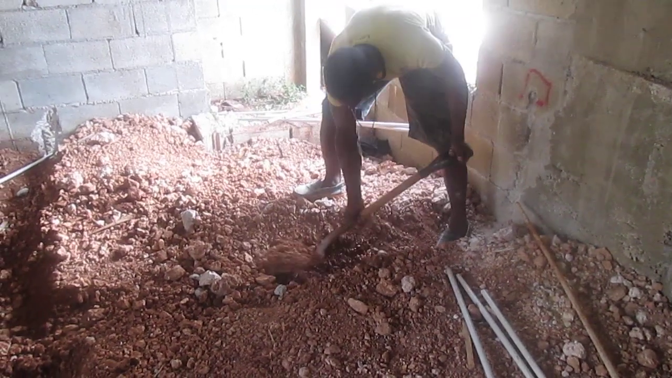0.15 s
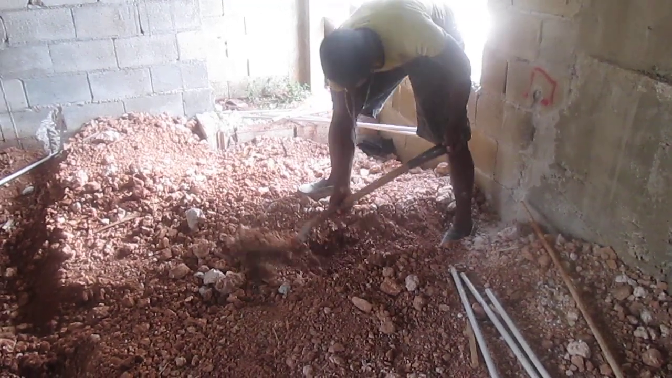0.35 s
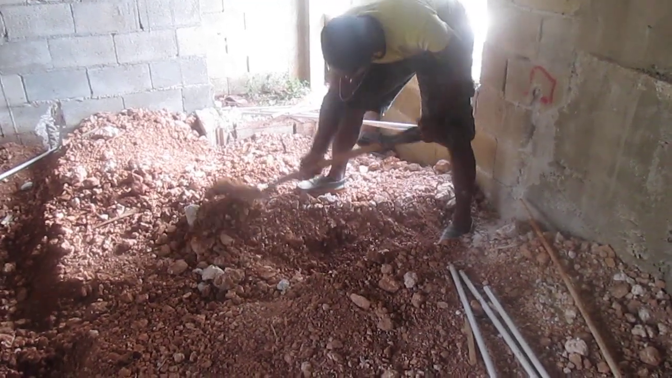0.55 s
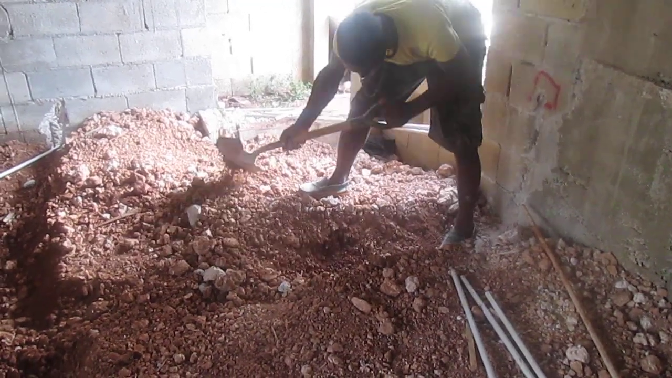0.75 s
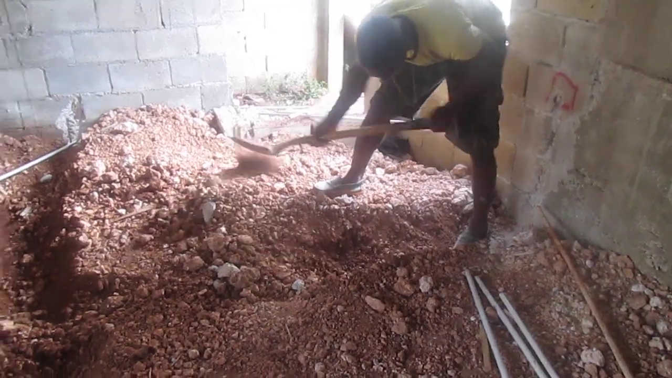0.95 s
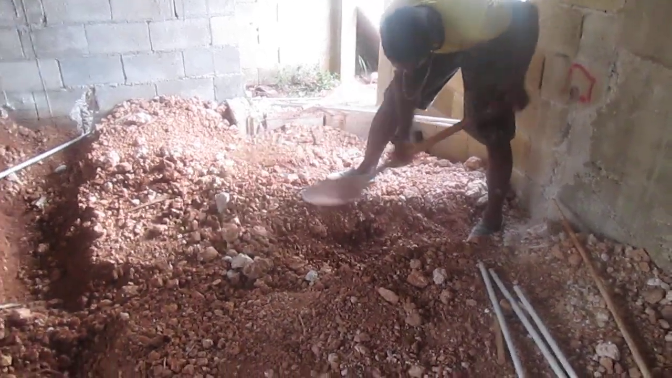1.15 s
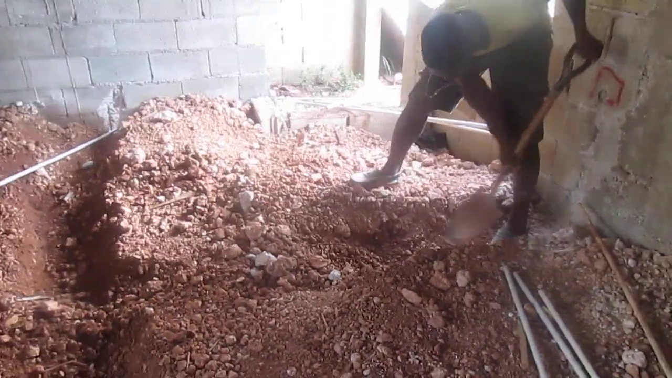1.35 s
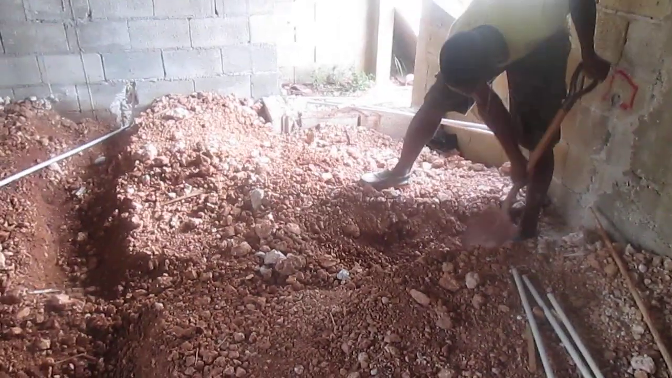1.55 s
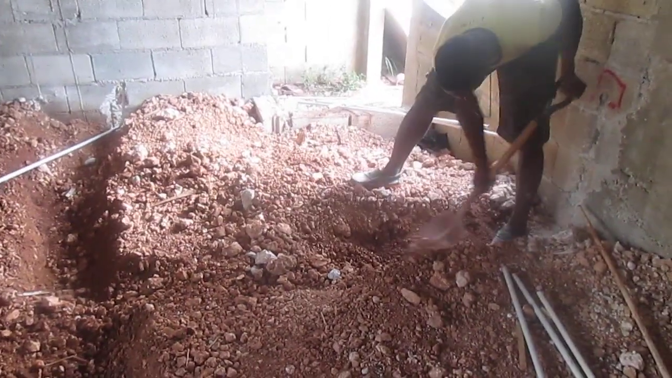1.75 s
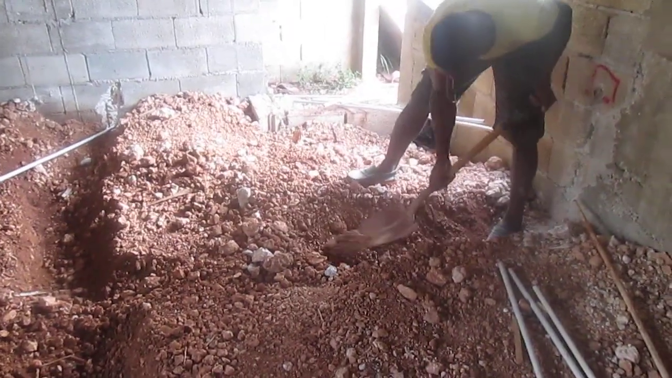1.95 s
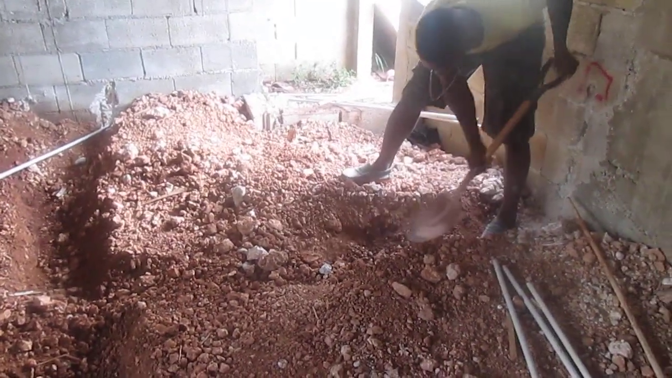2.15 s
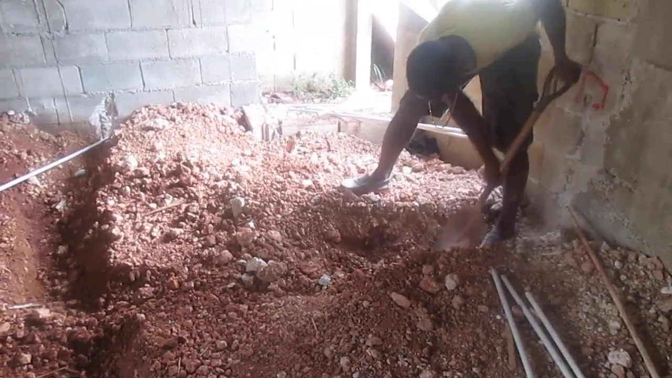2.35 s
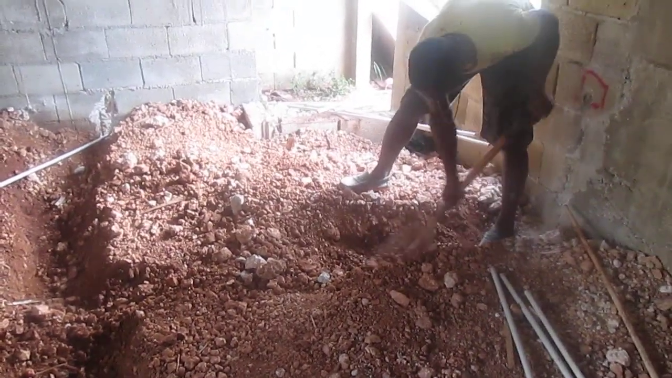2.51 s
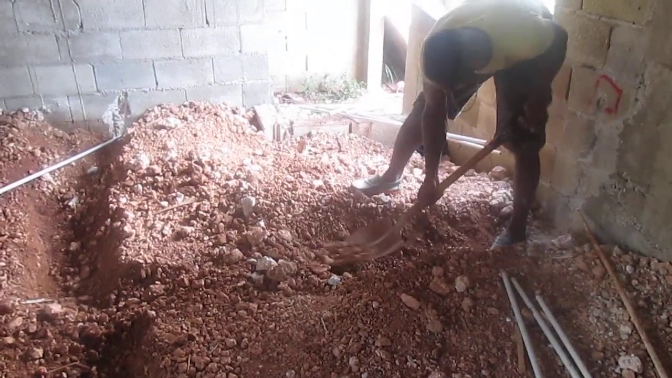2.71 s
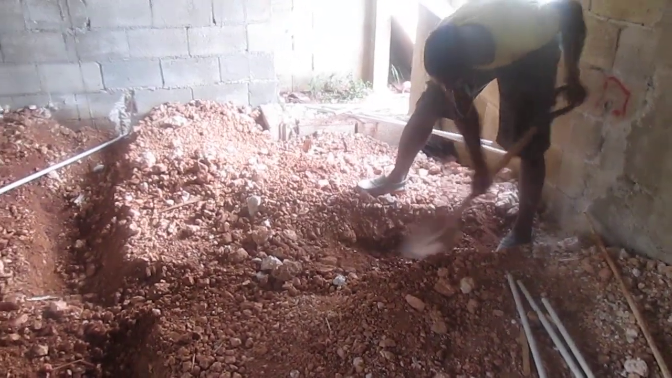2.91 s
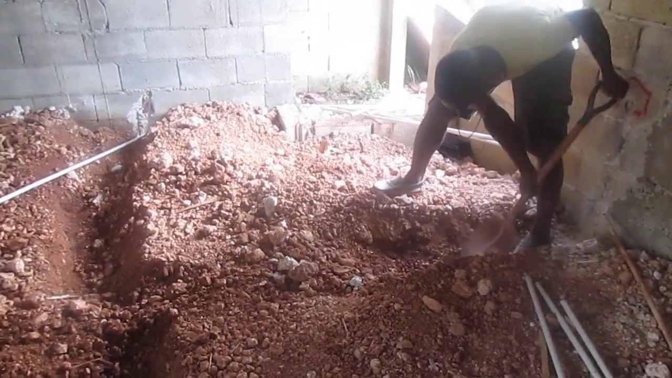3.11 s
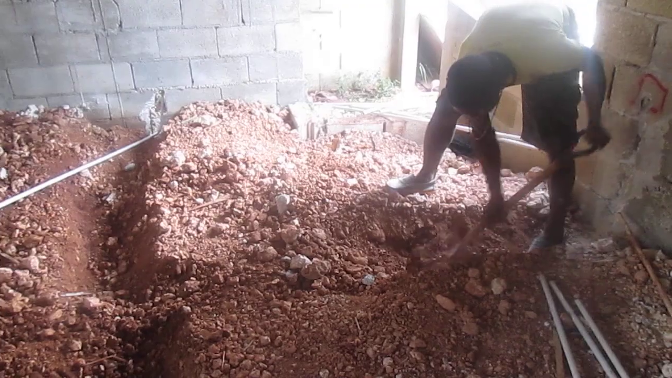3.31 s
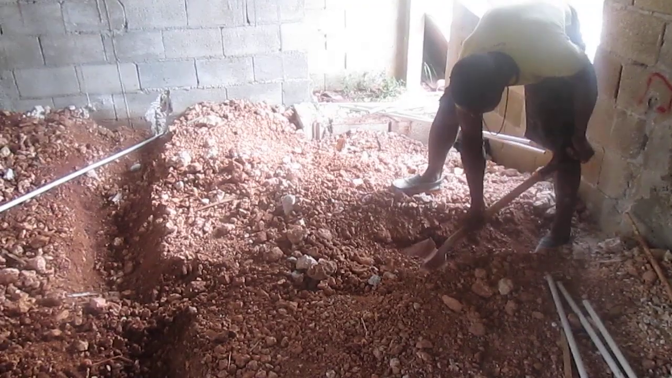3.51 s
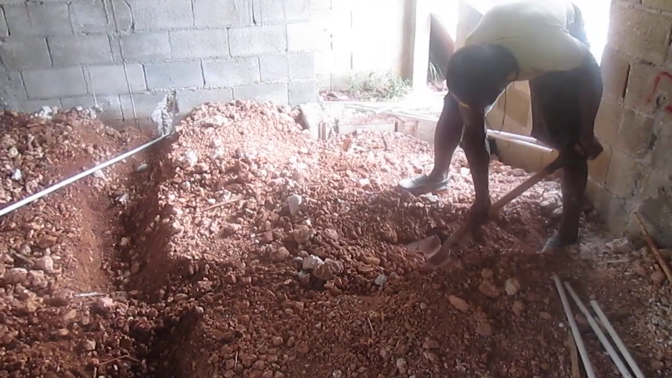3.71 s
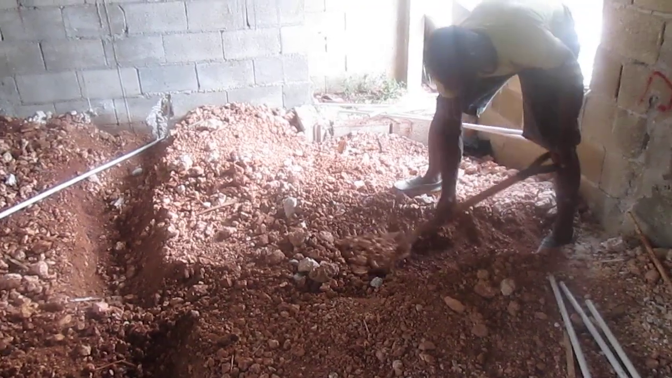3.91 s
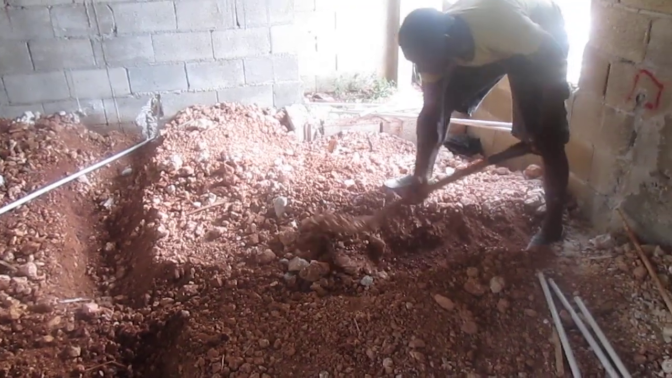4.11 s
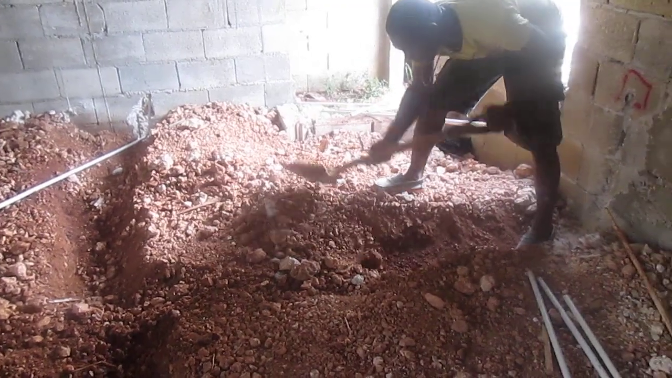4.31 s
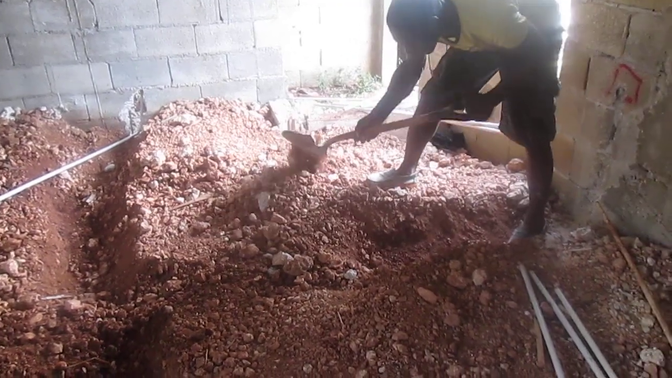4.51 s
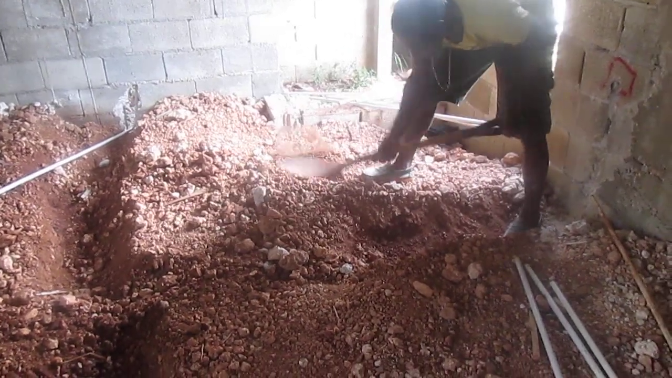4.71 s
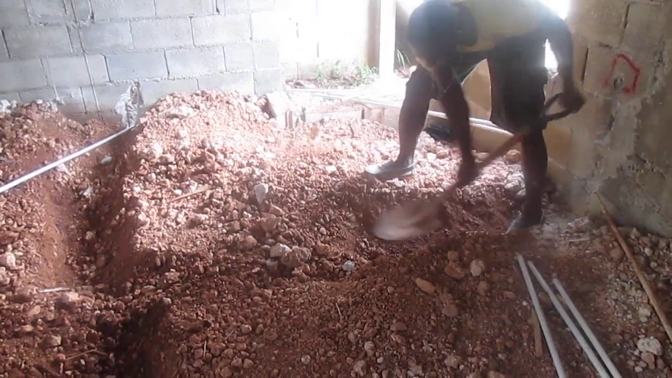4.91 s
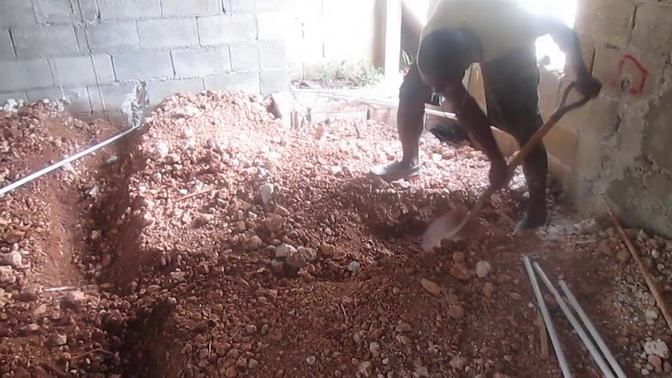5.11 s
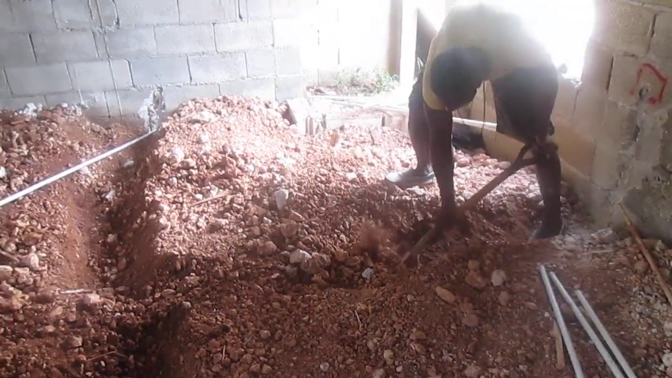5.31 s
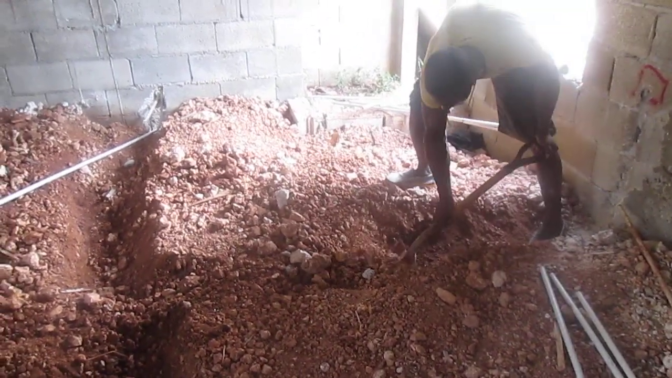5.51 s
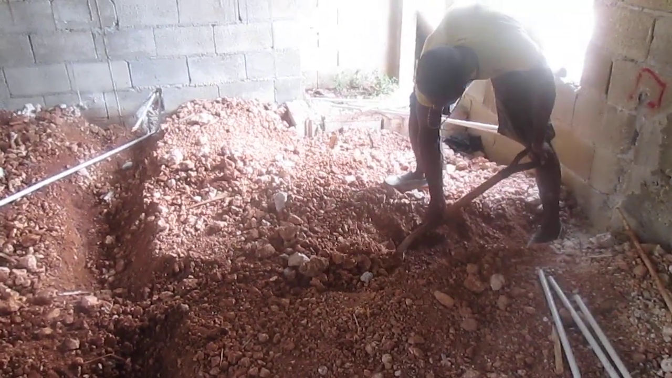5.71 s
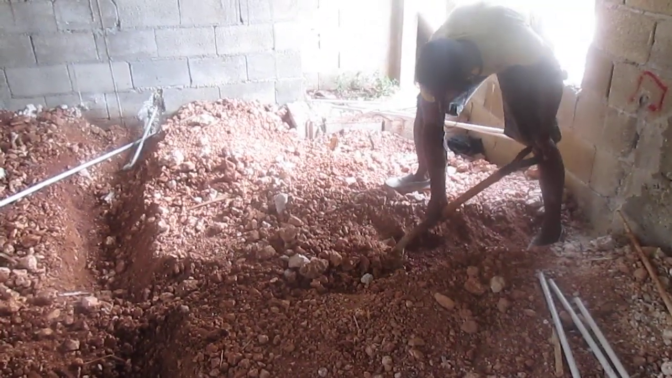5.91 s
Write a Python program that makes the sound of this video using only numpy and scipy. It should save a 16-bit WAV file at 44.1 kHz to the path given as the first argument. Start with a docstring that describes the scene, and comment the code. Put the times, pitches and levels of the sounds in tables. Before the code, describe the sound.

A steel shovel digs stony soil inside a bare block room. The blade stabs and scrapes in uneven strokes, stones grinding and knocking against it and making it ring briefly. Early on a load lands with a thud and a hiss of grit; busier scraping follows, then more pebbles scatter and another load drops. The walls add a short echo, and a light draught rumbles on the microphone.

```python
"""Inside bare block walls, a steel shovel digs stony soil: the blade stabs, scrapes and throws.
Stones grind and knock on the blade, which rings while it is clear of the soil. Grit patters down,
clods thud and loose earth slumps to the ground. The walls give a short echo, and a draught
brushes the microphone over a faint outdoor murmur."""
import sys
import numpy as np
from scipy import signal
from scipy.fft import rfft, irfft, next_fast_len
from scipy.io import wavfile
from scipy.ndimage import map_coordinates

SR = 44100
rng = np.random.default_rng(int(sys.argv[2]) if len(sys.argv) > 2 else 0)


def wav_out(sig):
    """Save sig, one row per channel (or a flat mono array), as 16-bit PCM at SR to the path in sys.argv[1]."""
    wavfile.write(sys.argv[1], SR, np.round(np.clip(np.atleast_2d(sig).T, -1, 1) * 32767).astype(np.int16))


N = 262395

# Moves of the blade (levels in all tables are relative): t/s, rise/s, hold/s, base fade/s,
# stones/dB, grit/dB, clods/dB, contact pitch/Hz, ring compared with stones/dB
BLADE_MOVES = [(0.0, 0.0021, 0.0026, 0.69, -30, -34.5, -40, 1970, 2.5),
               (0.024, 0.06, 0.0039, 0.27, -17.5, -27, -35, 1950, -11.5),
               (0.111, 0.024, 0.1, 0.76, -32, -42.5, -42, 1970, -19),
               (0.368, 0.0029, 0.15, 1.17, -39, -42.5, -59, 2280, 1),
               (0.472, 0.0039, 0.0032, 0.28, -21, -25, -57, 2450, -7),
               (0.623, 0.25, 0.0033, 0.31, -35, -33.5, -46, 1940, -25.5),
               (0.827, 0.00088, 0.014, 0.23, -11.5, -33, -35.5, 2730, -14.5),
               (0.84, .02, 0.032, 0.29, -47, -46, -21, 2850, -21),
               (0.867, 0.016, 0.33, 1.7, -42.5, -44.5, -54, 1900, -18.5),
               (1.353, 0.082, 0.037, 0.28, -41, -75.5, -48, 1930, -22),
               (1.486, 0.0015, 0.014, 1.8, -36.5, -38, -72, 1730, -2),
               (1.561, 0.0032, 0.03, 0.48, -23.5, -26.5, -34, 1840, -3),
               (1.719, 0.0071, 0.068, 0.23, -33, -46, -46, 2100, 5.5),
               (1.777, 0.0017, 0.0043, 0.19, -17.5, -23.5, -48, 2410, -3.5),
               (1.868, 0.074, 0.051, 0.66, -53.5, -46.5, -58, 2430, 13),
               (2.03, .015, 0.087, 0.23, -59, -47, -60, 2200, 1),
               (2.254, 0.05, 0.049, 0.71, -47, -62, -52, 1990, -14.5),
               (2.38, 0.0011, 0.14, 0.32, -23, -26.5, -32.5, 1880, -8),
               (2.45, 0.053, 0.1, 0.32, -17.5, -23, -41, 2760, -8),
               (2.662, 0.037, 0.0021, 0.87, -39.5, -43.5, -75, 2040, 4),
               (2.802, 0.0022, .003, 0.32, -16.5, -43, -29, 1940, -33),
               (3.144, 0.12, 0.1, 0.15, -23.5, -25.5, -38, 1944, -7),
               (3.343, 0.0086, 0.035, 0.22, -18.5, -20, -30, 2330, -6.5),
               (3.437, 0.013, .003, 0.74, -28, -36.5, -33, 1800, -12.5),
               (3.62, 0.04, 0.064, .2, -37, -48.5, -40.5, 1690, -14),
               (3.744, .003, 0.043, .2, -33, -38, -40.5, 1960, -18),
               (3.798, 0.001, 0.053, .3, -26.5, -36, -36.5, 2020, -5),
               (3.851, 0.033, 0.042, 0.41, -23.5, -32, -48.5, 1970, -4.5),
               (3.928, 0.02, 0.072, 1.42, -32, -40.5, -41, 1960, -13.5),
               (4.151, .004, 0.035, 0.44, -27.5, -36.5, -67, 1610, -13),
               (4.343, 0.065, 0.071, 1.4, -42.5, -39.5, -59, 2180, 2),
               (4.491, 0.035, 0.063, 0.79, -42.5, -37, -58, 1950, 3),
               (4.58, 0.043, 0.29, 1.4, -48, -42.5, -52, 2060, -15),
               (4.892, 0.084, 0.0035, 0.64, -38.5, -44, -38.5, 2160, -24.5),
               (5.128, 0.023, 0.0034, 0.28, -42, -57, -47.5, 1870, -5),
               (5.2145, 0.0023, 0.0073, 0.061, -30, -10.5, -27, 1860, -17),
               (5.216, 0.0012, .06, 0.34, -20.5, -30, -32, 1890, -16),
               (5.552, 0.14, 0.008, 0.69, -41.5, -49.5, -53, 1870, -13.5),
               (5.915, 0.042, 0.0035, .6, -34.5, -50, -46.5, 3000, -24)]
# Knocks of single stones: t/s, level/dB, f/Hz, scoop thump compared with crack/dB
STONE_KNOCKS = [(.0464, -24.5, 2100, 9.5), (0.0752, -2.5, 1880, -10), (0.197, -14, 3170, -22),
                (0.341, -12.5, 2500, -17), (0.3968, -28, 2280, 2), (0.4853, -10, 1140, -21),
                (.643, -17, 7000, -31), (0.6688, -18.5, 2860, -26), (.6936, -17, 6890, -30),
                (.7407, -41, 6500, -30), (.828, -1.5, 2400, -4), (0.96, -17.5, 6170, -30),
                (1.0525, -27, 1020, -25), (1.1743, -23, 2590, -33), (1.1882, -16.5, 6550, -34),
                (1.3711, -28, 2090, -39.5), (1.4137, -24.5, 2050, -10), (1.4461, -28, 1050, -16),
                (1.5, -15.5, 1900, -8.5), (1.5617, -20, 1810, -28), (1.7395, -17.5, 2200, 0.5),
                (1.7768, -8, 2020, 5), (2.1065, -36.5, 6440, -35), (2.28, -33.5, 1100, -11.5),
                (2.3865, -10, 1640, -12), (2.4262, -4.5, 1780, -22), (2.4388, -6, 1430, 2),
                (2.4994, -23.5, 3010, 13.5), (2.5262, -4.5, 2880, 4), (2.5641, -14, 2150, -13),
                (2.6069, -6, 2970, -2), (2.802, -7.5, 1860, -33), (3.027, -38.5, 2020, -11),
                (3.045, -38.5, 920, 1), (3.1414, -44.5, 3000, 16.5), (3.1654, -19, 1600, 1.5),
                (3.1928, -12, 1970, -32), (3.254, -13, 2070, -16), (3.3303, -11.5, 2960, -20),
                (3.3544, -16.5, 2380, 11), (3.4685, -12, 2260, -14), (3.5508, -21, 990, -3),
                (3.6157, -21.5, 1050, -6), (3.7432, -32, 1050, 4), (3.7967, -14, 1940, -32),
                (3.899, -10, 1830, -67), (4.0143, -13.5, 2810, -14), (4.1514, -9, 2400, -8),
                (4.162, -9, 1800, -9), (4.1808, -1.5, 1470, -32), (4.2776, -18, 3420, -32),
                (4.311, -18.5, 8300, -34), (4.3784, -8.5, 5300, -36), (4.519, -21, 1920, -31),
                (4.6773, -15.5, 5320, -34), (4.795, -22, 6210, -45), (4.8348, -28.5, 3000, -30),
                (4.8785, -14, 6350, -18), (4.9563, -7.5, 9300, -22), (4.997, -22.5, 1210, -5),
                (5.04, -28.5, 7000, -34), (5.129, -28, 3460, -25), (5.1519, -34, 4400, -1),
                (5.2148, -13, 4470, -18), (5.217, 1, 990, 6), (5.5, -28, 5100, -28),
                (5.6466, -24, 5840, -13), (5.7312, -24, 2800, -13), (5.881, -34, 5060, -11),
                (5.94, -24, 4900, -22)]


def shovel():
    """Each move grinds and knocks stones on the steel, sets it ringing and shifts grit and clods."""
    stones_gain, grit_gain, clods_gain, contact_octave, ring_db = blade_motion()
    rasp, steel = grinding_stones(contact_octave)
    stones = amp(-6.5) * stones_gain * (rasp + amp(-1) * steel)
    knocks, blows = knocking_stones()
    # the freer the blade is of the soil, the more it rings
    rubbing = amp(ring_db - 9.5) * stones_gain * (rasp + 0.45 * steel)
    striking = amp(ring_db + 0.5) * blows
    ring = ringing_blade(rubbing, striking, contact_octave)
    return stones + knocks + ring + grit_gain * pattering_grit() + clods_gain * rumbling_clods()


def blade_motion():
    """Loudness of stones, grit and clods over time; pitch and ring lean to the strongest move."""
    stones_db, grit_db, clods_db, contact_hz, ring_db = np.transpose(BLADE_MOVES)[4:]
    step = 32  # samples between points of the slow curves
    t = np.arange(0, N + step, step) / SR
    stones = move_power(t, stones_db, fade_scale=0.81) + 1e-20
    grit = move_power(t, grit_db, fade_scale=0.78)
    clods = move_power(t, clods_db, fade_scale=0.7)
    gains = [np.sqrt(power.sum(0)) for power in (stones, grit, clods)]
    averages = [column @ stones / stones.sum(0) for column in (np.log2(contact_hz), ring_db)]
    return [np.interp(np.arange(N) / step, np.arange(len(t)), curve) for curve in gains + averages]


def move_power(t, db, fade_scale):
    """Each move swells, holds and fades; a quick stab starts with the nearest stone knock."""
    start, rise, hold, fade = np.transpose(BLADE_MOVES)[:4, :, None]
    knock_times = np.transpose(STONE_KNOCKS)[0]
    nearest_knock = knock_times[np.abs(start - knock_times).argmin(1)][:, None]
    is_stab = (rise < 0.008) & (start > 0)
    age = t - np.where(is_stab, nearest_knock, start)
    rising = np.clip(age / np.maximum(rise, 0.001), 0, 1)
    fading = amp(-60 * np.maximum(age - rise - hold, 0) / (fade_scale * fade))
    return (amp(db)[:, None] * rising * fading) ** 2


def grinding_stones(contact_octave):
    """Stones rasp on steel muffled by soil; its blurred notes are strongest near the contact pitch."""
    # tone of the rasp: f/Hz, level/dB
    rasp_spectrum = [(150, -72.5), (250, -17), (455, -15.5), (615, 2), (855, 4.5), (1190, -9), (1810, -1.5),
                     (3060, 4), (3890, -4), (9000, -19.5), (11700, -85), (19800, -120)]
    grind = crunch(per_second=4000, spread_db=-3, clump_db=2.0, hiss=1.0)
    steel = sum(near(hz, contact_octave, 0.29) * resonance(grind, hz, t60=9 / hz)
                for hz in 1450 * 1.521 ** np.arange(6))
    return coloured(grind, rasp_spectrum), steel


def knocking_stones():
    """Each stone cracks and thumps the scoop. Returns the sound and the force on the steel."""
    sound, blows = np.zeros((2, N + SR))
    t = np.arange(SR // 10) / SR
    loads = rng.standard_normal(len(STONE_KNOCKS))
    for (start, db, hz, thump_db), load in zip(STONE_KNOCKS, loads):
        at = round(start * SR)
        chips, rattle = rng.standard_normal((2, len(t)))
        crack = stone_crack(chips, t, db, hz)
        scoop_hz = 763.5 * (1 + 0.078 * load)  # the scoop's dull note shifts with its load
        thump_shape = amp(-60 * t / 0.026) * (1 - np.exp(-(t / 0.0014) ** 2))
        thump = np.sin(2 * np.pi * scoop_hz * t) * thump_shape
        sound[at:][:len(t)] += amp(db - 8.0) * crack + amp(db + thump_db) * thump
        # a brief rattle makes every blow wake a different mix of the blade's notes
        force = amp(db - 60 * t / 0.0055) * (0.28 * rattle + 2.05 * crack)
        on_blade = 1 / (1 + (hz / 4160) ** 6)  # high-pitched pebbles miss it and fall on the heap
        blows[at:][:len(t)] += on_blade * force
    return sound[:N], blows[:N]


def stone_crack(noise, t, db, hz):
    """A burst of noise around one pitch: small high pebbles snap, large low stones crunch slowly."""
    # quiet knocks fade more slowly than loud ones
    t60 = max(0.017 * 2 ** (-db / 16.5), 0.004)
    fading = hz / 3000 * amp(-60 * t / 0.0022) + 6.3 * amp(-60 * t / t60)
    rising = 1 - np.exp(-t * hz / 9.8)
    band = signal.butter(2, [hz / 1.78, min(hz * 1.55, SR / 2.2)], "bandpass", fs=SR, output="sos")
    crack = signal.sosfilt(band, noise * fading * rising)
    return crack / np.abs(crack).max()


def ringing_blade(rubbing, striking, contact_octave):
    """Blows wake all the steel's notes; a scrape favours those near its own pitch."""
    # the blade's natural notes: f/Hz, level/dB, time to fade by 60 dB/s
    blade_notes = [(603, -3.5, .07), (665, -12.5, 0.13), (888, -8, 0.24), (1104, -4, 0.25),
                   (1610, -22, 0.24), (1728, -0.5, 0.23), (1877, -0.5, 0.13), (2142, -5.5, 0.2),
                   (2426, -3.5, 0.27), (3060, 2, 0.059), (3260, -5.5, .14), (3503, 1, 0.03),
                   (3750, -3, 0.1), (4474, 3.5, 0.067), (4850, 6, 0.015), (5000, -4, 0.081),
                   (5800, 3.5, 0.16), (6050, -12, 0.07), (6840, 5.5, 0.016)]
    ring = np.zeros(N)
    for hz, db, t60 in blade_notes:
        struck = striking * (0.73 + near(hz, contact_octave, 0.16))
        rubbed = rubbing * (0.19 + 0.37 * near(hz, contact_octave, 0.048))
        ring += amp(db) * resonance(struck + rubbed, hz, t60)
    return ring


def pattering_grit():
    """Thousands of tiny grains land each second and blend into a bright hiss."""
    # tone of the grit: f/Hz, level/dB
    grit_spectrum = [(1200, -10.5), (3000, -0.5), (5000, 1.5), (7000, -0.5), (10000, -4), (12500, -12.5),
                     (15600, -26.5)]
    return coloured(crunch(per_second=3100, spread_db=2.5, clump_db=3.04, hiss=0.82), grit_spectrum)


def rumbling_clods():
    """Lumps of soil thud and blend into a low rumble."""
    # tone of the clods: f/Hz, level/dB
    clod_spectrum = [(45, -42.5), (85, -19), (170, 7), (300, 5), (500, 3.5), (900, -35.5)]
    return coloured(crunch(per_second=270, spread_db=0.5, clump_db=3.0, hiss=0.78), clod_spectrum)


def slumping_earth():
    """Small lumps land first, the heavy mass last, so the thud sinks in pitch as it fades."""
    # falls of loose earth: t/s, level/dB, first pitch/Hz, last pitch/Hz, length/s
    falls = [(0.832, -16.5, 900, 67.4, 0.14), (2.808, -34, 790, 150, 0.18), (5.223, -28.5, 513, 343, 0.045)]
    sound, t = np.zeros(N + SR), np.arange(SR // 12) / SR
    for start, db, first_hz, last_hz, length in falls:
        for progress, scatter, size, side in rng.random((40, 4)):
            sinking_hz = first_hz * (last_hz / first_hz) ** (progress ** 0.39)
            hz = sinking_hz * 2 ** (1.22 * (scatter - 0.5))
            lump = np.sign(side - 0.5) * np.sin(2 * np.pi * hz * t) * np.exp(-t * hz / 1.24)
            at = round((start + progress * length) * SR)
            sound[at:][:len(t)] += amp(db + 8 * size - 34 * progress ** 2) * lump
    return sound[:N]


def wall_echo(sound):
    """Each pitch dies away at its own speed; every 0.3 s of sound gets a new pattern of echoes."""
    # how long the walls echo: f/Hz, time to fade by 60 dB/s
    echo_times = [(150, 0.54), (700, 0.35), (2000, 0.064), (5000, 0.26), (13000, 0.069)]
    echo = np.zeros(N + SR)
    step, delay = SR * 3 // 10, 180  # samples
    for at in range(0, N, step):
        hz, t, noise = signal.stft(rng.standard_normal(SR // 2), SR, nperseg=256)
        fading = amp(-60 * t / along(echo_times, hz)[:, None])
        tail = signal.istft(noise * fading, SR, nperseg=256)[1]
        piece = signal.fftconvolve(sound[at:at + step], tail / np.linalg.norm(tail))
        echo[at + delay:][:len(piece)] += piece[:N + SR - at - delay]
    return echo[:N]


def draught():
    """Uneven puffs of air brush the microphone and make a deep rumble."""
    # strength of the draught: t/s, level/dB
    gusts = [(0.0, -80), (0.21, -42.5), (0.45, -50), (0.72, -55), (0.88, -40), (1.0, -44), (1.5, -60),
             (2.33, -58.5), (2.75, -79), (2.84, -59), (3.05, -74), (3.36, -58), (3.45, -49), (3.76, -41),
             (3.86, -57), (4.02, -46.5), (4.37, -39), (4.49, -51.5), (5.2, -51), (5.95, -61)]
    # tone of the puffs: f/Hz, level/dB
    puff_spectrum = [(15, -2), (35, 3.5), (60, 18), (90, -3.5), (160, -30)]
    puffs = coloured(rng.standard_normal(N), puff_spectrum) * amp(0.91 * wobble(11))
    level_db = np.interp(np.arange(N) / SR, *np.transpose(gusts))
    return amp(level_db) * unit(puffs)


def outdoor_murmur():
    """A faint, low noise from outside whose level wavers."""
    # tone of the murmur: f/Hz, level/dB
    murmur_spectrum = [(35, 10.5), (60, 0), (320, -2), (642, -7.5), (1050, -5.5), (1380, -16.5),
                       (1910, -23), (3930, -25), (9280, -28.5), (15500, -35)]
    return coloured(rng.standard_normal(N), murmur_spectrum) * amp(-52 + 1.8 * wobble(9))


def crunch(per_second, spread_db, clump_db, hiss):
    """Random clicks of uneven strength mixed with hiss, swelling in clumps."""
    struck = rng.random(N) < per_second / SR
    sizes = amp(spread_db * np.minimum(rng.exponential(size=N), 3)) * rng.standard_normal(N)
    grains = unit(struck * sizes) + hiss * rng.standard_normal(N)
    return unit(grains * amp(clump_db * wobble(45)))


def resonance(force, hz, t60):
    """One note set ringing by a force; it fades by 60 dB in t60 seconds."""
    decay, angle = amp(-60 / (t60 * SR)), 2 * np.pi * hz / SR
    gain = 2 * np.sin(angle) * np.sqrt(1 - decay)
    return signal.lfilter([0, gain], [1, -2 * decay * np.cos(angle), decay * decay], force)


def near(hz, centre_octave, width_octaves):
    """1 when a pitch is at the centre (log2 of Hz), less the further away it is."""
    return np.exp(-0.5 * ((np.log2(hz) - centre_octave) / width_octaves) ** 2)


def wobble(rate):
    """A smooth curve through `rate` random points a second."""
    return map_coordinates(rng.standard_normal(int(N * rate / SR) + 4), [np.arange(N) * rate / SR])


def coloured(x, spectrum):
    """Give x the tone of a spectrum table, at an average level of 1."""
    return unit(filtered(x, lambda hz: amp(along(spectrum, hz))))


def filtered(x, response):
    """Multiply each frequency in x by response(hz)."""
    size = next_fast_len(N + SR // 2)
    return irfft(rfft(x, size) * response(np.fft.rfftfreq(size, 1 / SR)), size)[..., :N]


def along(points, hz):
    """Read between the rows of a (f/Hz, value) table on a log frequency scale."""
    freqs, values = np.transpose(points)
    return np.interp(np.log(hz + 1), np.log(freqs + 1), values)


def unit(x):
    """Scale x to an average (rms) level of 1."""
    return x / np.sqrt(np.mean(x ** 2) + 1e-20)


def amp(db):
    """Turn decibels into a gain."""
    return 10 ** (np.asarray(db) / 20)


def scene():
    """The digging, its echo and the air around it, in one channel."""
    digging = shovel() + slumping_earth()
    return (digging + amp(-14.0) * wall_echo(digging) + draught() + outdoor_murmur())[None]


def record(dry):
    """Round off the loudest blows, then cut two narrow bands, the deepest bass and the top treble."""
    # narrow bands cut from the sound: f/Hz, width/Hz
    notches = [(3940, 132), (7880, 260)]
    bass_hz, top_hz = 35, 15640

    def response(hz):
        gain = 1j * hz / (bass_hz + 1j * hz) * (hz < top_hz)
        for centre, width in notches:
            gap = centre ** 2 - hz ** 2
            gain *= gap / (gap + 1j * hz * width)
        return gain

    clipped = dry / (1 + np.abs(dry) ** 8) ** (1 / 8)
    return filtered(clipped, response)


dry = scene()
out = record(dry)
wav_out(out)
```